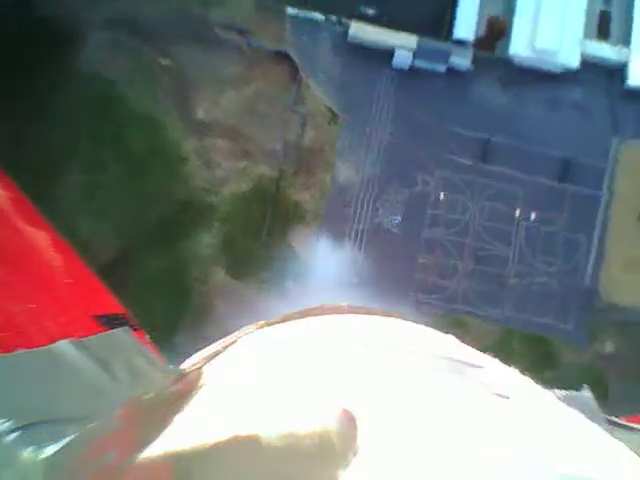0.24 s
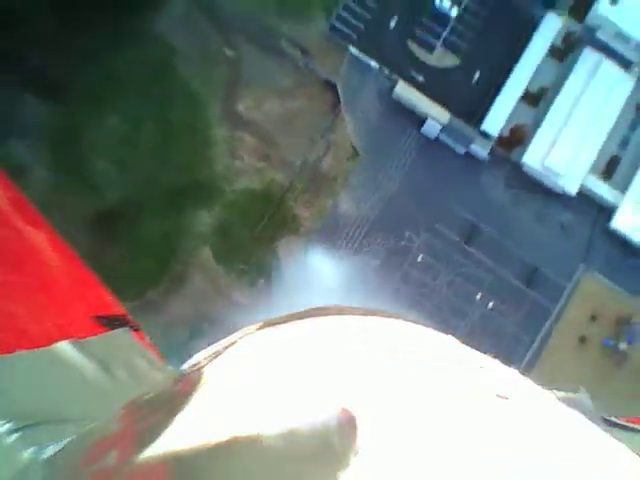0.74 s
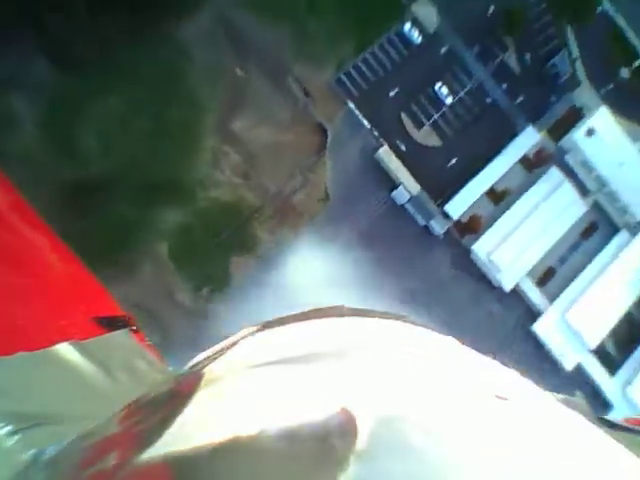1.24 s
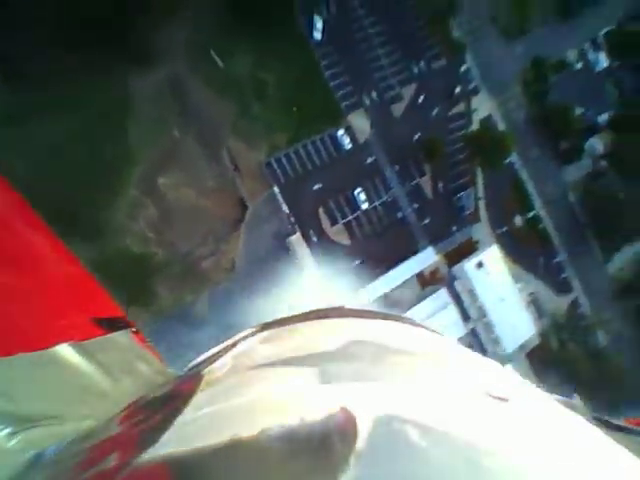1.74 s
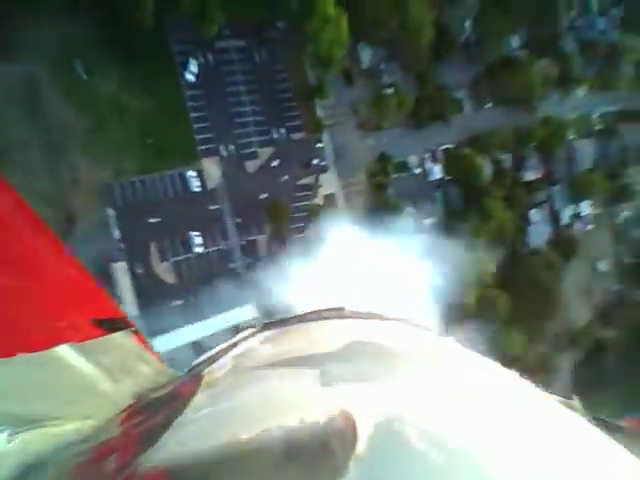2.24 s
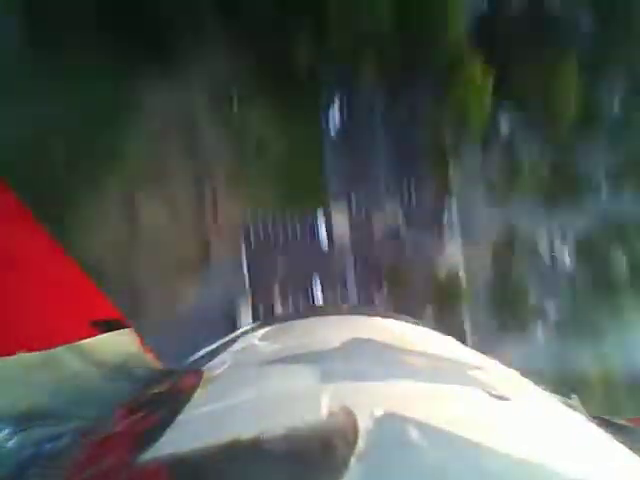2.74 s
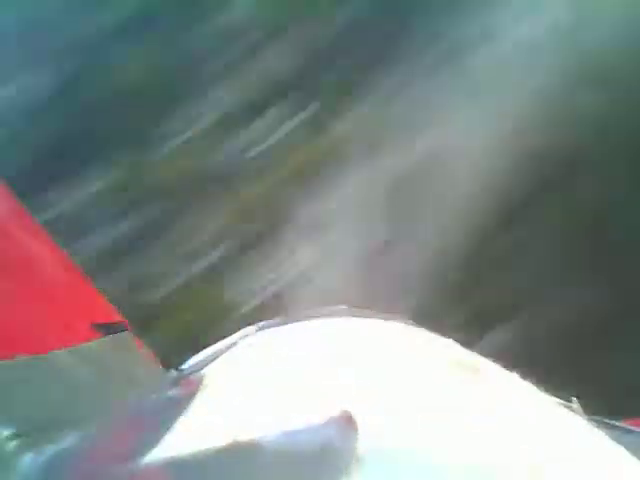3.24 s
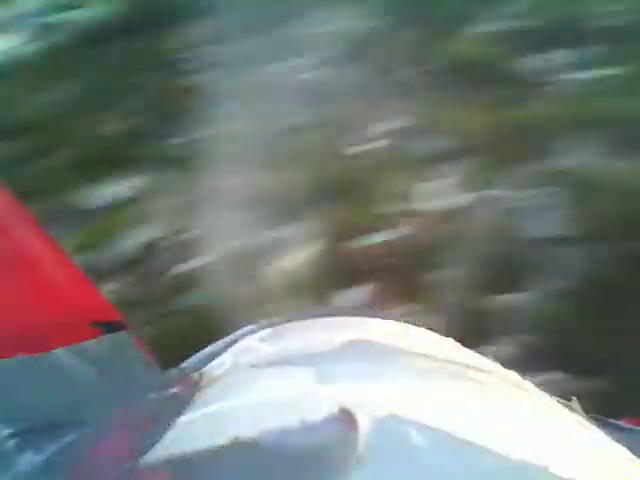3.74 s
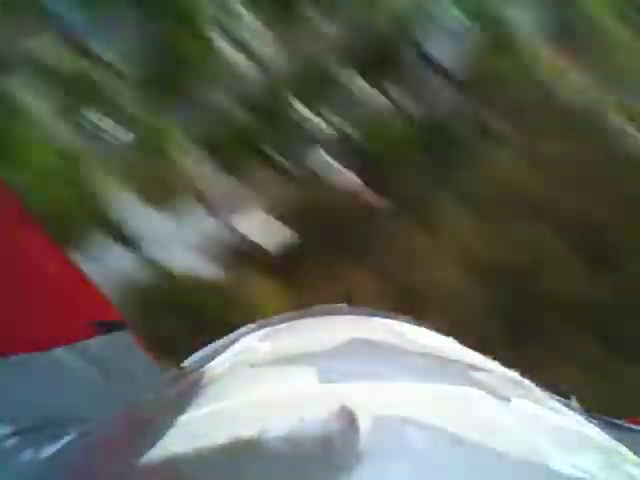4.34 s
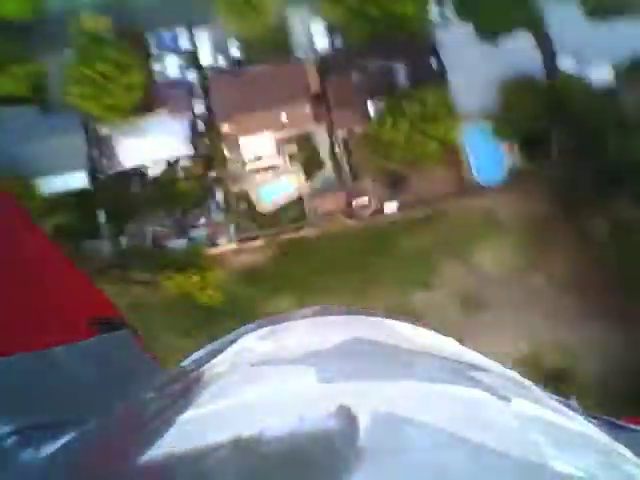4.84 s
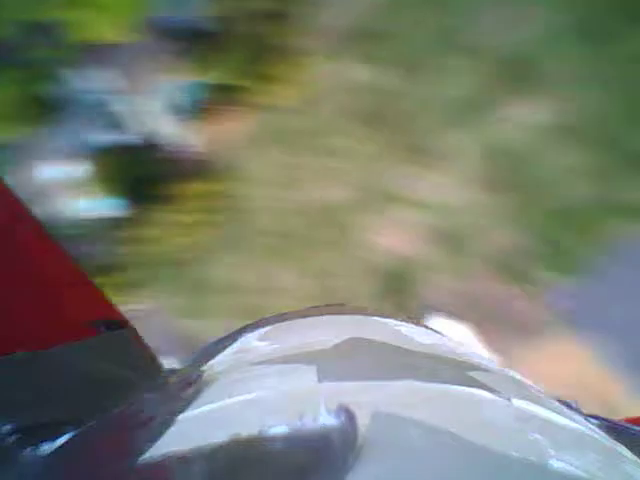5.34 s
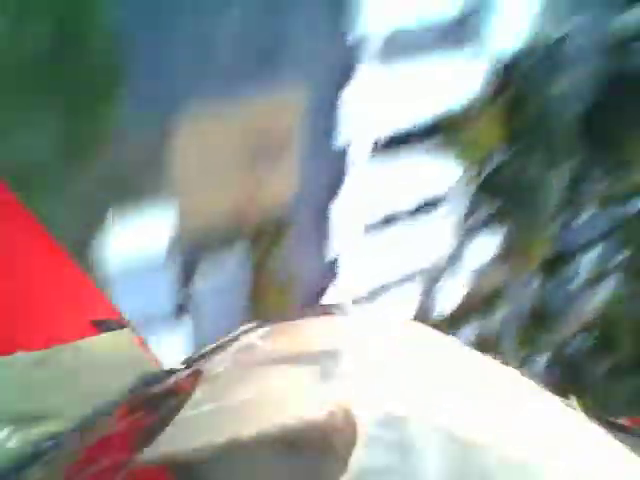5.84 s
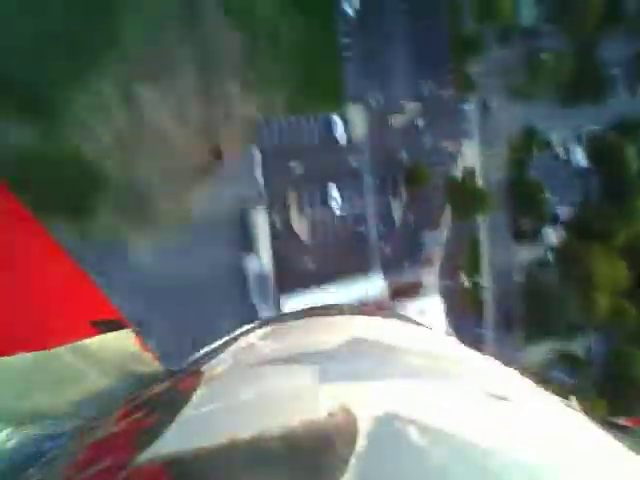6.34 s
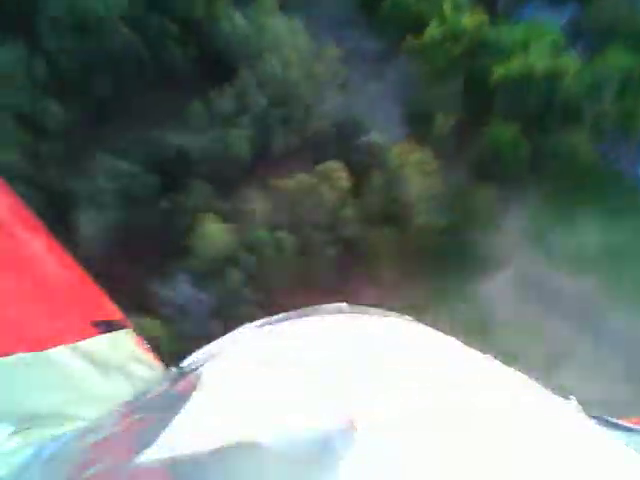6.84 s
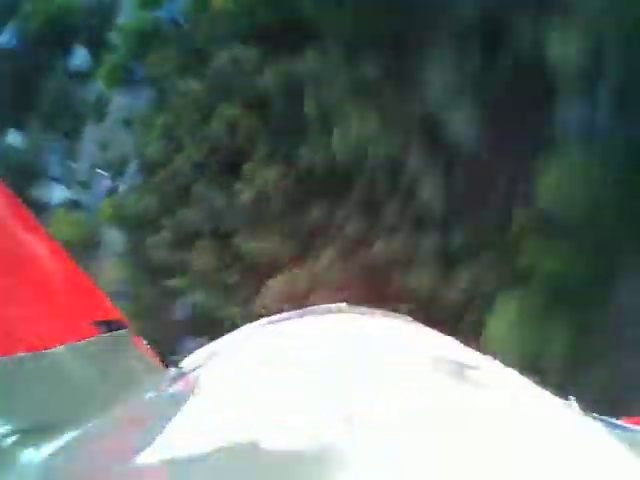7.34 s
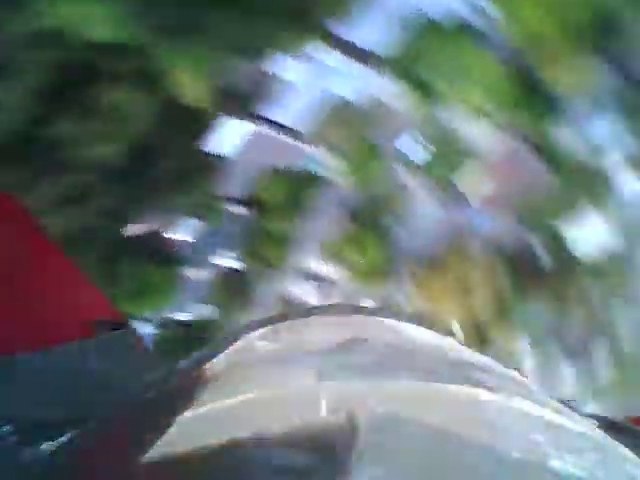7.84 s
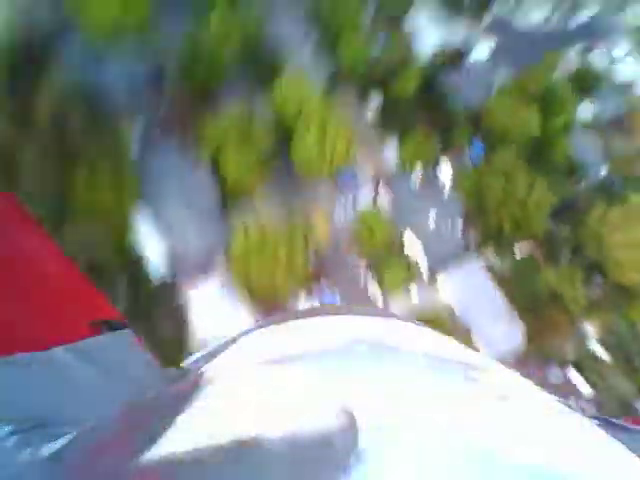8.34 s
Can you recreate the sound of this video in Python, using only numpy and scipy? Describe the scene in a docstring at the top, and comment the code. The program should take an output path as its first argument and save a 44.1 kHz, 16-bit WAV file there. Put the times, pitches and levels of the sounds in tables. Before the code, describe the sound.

Aboard a model rocket in open air, a rough motor roar with a faint sputtering hiss grows duller and weaker, then two quick blasts burst out. The tumbling tube follows: hollow knocks and bright clacks at irregular moments, gritty cord scraping, and gusts thumping the microphone. Close, dry, dull sound, crackling and distorting on hard blows.

```python
"""In open air, aboard a model rocket, a small camera is taped on and its microphone is in the airflow.
The motor is shaped noise that roars, turns duller and burns out; two noise surges are the ejection charge.
Then the tube tumbles: the nose cone knocks on it as ringing modes, the cord rubs as dense tiny slips,
and gusts of lumpy noise buffet the microphone. The little recorder overloads on the hard blows,
crackles with dropouts and keeps little treble."""
import sys
import numpy as np
from scipy import signal
from scipy.fft import rfft, irfft
from scipy.io import wavfile
from scipy.ndimage import uniform_filter1d, minimum_filter1d

SR = 44100
rng = np.random.default_rng(int(sys.argv[2]) if len(sys.argv) > 2 else 0)


def transcribe(u):
    """Save the signal u as a 16-bit wav file named by the first command-line argument.

    u: samples, shape (n,) or (channels, n), limited to [-1, 1]; the rate is SR.
    q: integer samples, one column per channel.
    """
    v = np.clip(np.atleast_2d(u).T, -1, 1)
    q = np.round(v * 32767).astype(np.int16)
    wavfile.write(sys.argv[1], SR, q)


N = 379260
TIME = np.arange(N) / SR

# Blows of the nose cone on the airframe. Each row: moment in seconds, level in dB, brightness in dB,
# contact (time to peak force) in seconds. Dull blows (brightness below 0) sound mostly the air column,
# bright ones the camera case; a long contact crunches.
KNOCKS = [(2.231, -10.5, 22.5, 0.00023), (2.2448, -10, 6.5, 0.00055), (2.3379, -2.5, -5.5, 0.0023),
          (2.4128, -6, 0, 0.0011), (2.631, -11, 27, 0.00018), (2.759, -16.5, -4, 0.0022),
          (3.1773, -4.5, 9, 0.00034), (3.233, -12.5, 18, 0.00021), (3.2539, 2, -4.5, 0.0011),
          (3.522, -7.5, 14, 0.00087), (3.533, -11, 20.5, 0.00049), (3.767, -16, -13, .001),
          (3.804, -6, -11.5, 0.0018), (3.824, -2, 23, .0005), (4.1846, -1, 14.5, .0004),
          (4.1887, -10.5, 14.5, 0.00037), (4.202, -8, 19, 0.00037), (4.4367, -6, -4.5, 0.0008),
          (4.4448, -5, 7.5, 0.00056), (4.8091, -1.5, 15, 0.00062), (4.996, -13, -6, 0.00088),
          (5.0066, 0, 1, 0.00068), (5.033, -10, -3.5, 0.0019), (5.392, -9, -9, 0.0025),
          (5.423, 0, -15.5, 0.0015), (5.4328, -3.5, 22, 0.00032), (5.476, -5, -7, 0.0007),
          (5.4953, -7.5, -3, 0.0013), (5.86, -7, 0, 0.00073), (5.87, 0, -4.5, 0.003),
          (6.038, -1, 5.5, 0.0005), (6.1865, -6, -3.5, .001), (6.194, -4.5, 1, .0007),
          (6.4873, -2, 1, 0.001), (6.64, -10.5, -3, 0.0016), (6.994, -11, -5, .002),
          (7.051, -13.5, 10.5, 0.00062), (7.057, -11.5, 15, 0.0004), (7.194, -19, 3.5, .0005),
          (7.914, 1.5, 13.5, 0.00047), (8.0781, 2.5, 1.5, 0.00045), (8.284, -12.5, -11, 0.0027),
          (8.382, -8, -6.5, 0.00071), (8.515, -2.5, -6.5, 0.002), (8.536, 0, -6.5, 0.0012),
          (8.5771, -2.5, -1, 0.0011)]


def undb(db):
    """Decibels to gain."""
    return 10 ** (np.asarray(db) / 20)


def unit(x):
    """Scale to rms 1."""
    return x / np.sqrt(np.mean(x ** 2))


def gains(rows):
    """One gain curve for each dB column after the seconds; silent outside the table."""
    s, *columns = np.transpose(rows)
    return [undb(np.interp(TIME, s, column, left=-120, right=-120)) for column in columns]


def colour(x, points):
    """Filter x by a curve of (Hz, dB) points that falls away beyond both ends, then scale to rms 1."""
    hz, db = np.transpose(points)
    f = np.maximum(np.fft.rfftfreq(N, 1 / SR), 1)
    skirts = np.minimum(f / hz[0], 1) * np.minimum(hz[-1] / f, 1) ** 2
    curve = undb(np.interp(np.log(f), np.log(hz), db))
    return unit(irfft(rfft(x) * curve * skirts, N))


def walk(rate):
    """Glide between random levels, one each 1 / rate seconds; spread about 1."""
    k = int(SR / rate)
    steps = np.repeat(rng.standard_normal(N // k + 1), k)
    return unit(uniform_filter1d(steps, k)[:N])


def grains(per_s, spread_db):
    """Random impulses of uneven size and either sign."""
    hit = rng.random(N) < per_s / SR
    sizes = undb(spread_db * np.clip(rng.standard_normal(N), -2, 2))
    return hit * rng.choice([-1, 1], N) * sizes


def arch(start, length, skew=1):
    """A rounded rise and fall of height 1; skew under 1 brings the top forward."""
    inside = slice(*np.searchsorted(TIME, [start, start + length]))
    along = (TIME[inside] - start) / length
    shape = np.zeros(N)
    shape[inside] = np.abs(np.sin(np.pi * along ** skew)) ** .8
    return shape


def coast(kicks, fall_s):
    """Each kick dies away exponentially, by 1/e in fall_s."""
    return signal.lfilter([1], [1, -np.exp(-1 / (fall_s * SR))], kicks + 1e-12)


def lee(lull_s=0.19):
    """How far the tube shelters the microphone, 0-1, in lulls of lull_s seconds."""
    # Moments in the lee of the tube. Each row: middle in seconds, shelter from 0 to 1.
    lulls = [(2.31, 0.5), (3.31, 0.4), (3.579, 0.13), (4.241, 1), (4.55, 0.6), (4.93, 0.36), (5.13, 0.6),
             (5.68, 0.32), (6.1, 0), (6.85, 0.67), (7.14, 0.66)]
    return sum(shelter * arch(s - lull_s / 2, lull_s) ** 2 for s, shelter in lulls)


def shares(brightness_db):
    """Split a blow between air column, tube wall and camera case, each one brightness step above the last."""
    split = undb(brightness_db * np.arange(3))
    return split / np.linalg.norm(split)


def motor():
    """Turbulent roar that shifts to the bass with speed, and a sputtering hiss of the jet."""
    # Motor burn. Each row: time in seconds, roar in dB, hiss of the jet in dB, both before sputter.
    burn = [(0, -12.5, -30), (.3, -13.5, -26.5), (1.1, -15, -33), (1.4, -16, -41.5), (1.65, -18, -47.5),
            (1.9, -24, -47), (2.08, -25.5, -45), (2.18, -26.5, -36)]
    # The roar sinks as the rocket outruns its own jet noise. Each row: time in seconds, late colour 0-1.
    climb = [(0, 0.02), (.5, 0.13), (1.0, 0.5), (1.45, 1), (2.2, 0.98)]
    # Spectra of the roar at lift-off, the roar in fast flight, and the jet.
    # Each row: frequency in Hz, relative level in dB.
    roar_early = [(25, -26.5), (70, -15.5), (150, -10.5), (280, -2.5), (480, -2), (750, -3), (1300, -7.5),
                  (1800, -13), (2600, -24)]
    roar_late = [(25, -13.5), (70, -8), (130, -2.5), (260, 2), (380, -1.5), (550, -3), (800, -6.5),
                 (1300, -7), (1800, -18.5), (2600, -30.5)]
    jet_colour = [(900, -17.5), (1700, -16.5), (2300, 1.5), (3000, -4), (3600, -10.5), (4200, -5.5)]
    roar, hiss = gains(burn)
    late = np.clip(np.interp(TIME, *np.transpose(climb)), 0, 1)
    eddies = rng.standard_normal(N)
    body = (1 - late) * colour(eddies, roar_early) + late * colour(eddies, roar_late)
    sputter = walk(70)
    jet = colour(rng.standard_normal(N), jet_colour) * undb(2.8 * sputter)
    return roar * np.clip(body, -3, 3) * undb(1.18 + .5 * sputter) + hiss * jet


def cord_speed(lull_db=-9, wander_db=4, jerk_spread_db=3):
    """The cord never lies quite still: it jerks, speeds up into bright blows, coasts on and strokes between."""
    # Strokes between the blows. Each row: start in seconds, length in seconds, speed in dB.
    stroke_rows = [(2.199, 0.11, -36.5), (2.293, 0.11, -41), (2.416, 0.082, -37), (2.518, 0.16, -33),
                   (3.043, 0.15, -30.5), (3.351, 0.04, -34), (3.423, 0.12, -37), (3.66, 0.082, -44),
                   (3.896, 0.024, -35), (4.032, 0.087, -37), (4.47, 0.12, -44), (4.604, 0.13, -36),
                   (5.042, 0.061, -36.5), (5.252, 0.061, -37.5), (5.583, 0.13, -46), (5.703, 0.11, -39),
                   (6.322, 0.042, -34), (6.752, 0.076, -42), (6.873, 0.05, -32.5), (7.29, 0.017, -31),
                   (7.318, 0.014, -35), (7.405, 0.23, -44.5), (7.573, 0.11, -34.5), (7.724, 0.048, -33),
                   (7.94, 0.039, -57), (8.131, 0.058, -47), (8.214, 0.058, -36)]
    floor_db = -57
    jerks_per_s, jerk_db, jerk_s = 22, -40, 0.0041  # small random tugs; time to fall by 1/e
    tighten_db, tighten_s = -43.5, 0.12  # the cord draws tight before a bright blow on the camera case
    slide_on_db, slide_on_s = -35, 0.021  # after a blow: relative to its level; time to fall by 1/e
    tugs = undb(jerk_db) * coast(np.abs(grains(jerks_per_s, jerk_spread_db)), jerk_s)
    creep = undb(floor_db + wander_db * walk(28))
    idle = (creep + tugs) * undb(lull_db * lee())
    kicks, tighten = np.zeros((2, N))
    for s, db, brightness_db, _ in KNOCKS:
        kicks[int(s * SR)] = undb(db + slide_on_db)
        if brightness_db > 0:
            pull = shares(brightness_db)[-1] ** 4 * arch(s - tighten_s, tighten_s, skew=2.6)
            tighten = np.maximum(tighten, pull)
    strokes = sum(undb(db) * arch(start, length) for start, length, db in stroke_rows)
    return idle + np.maximum(strokes, undb(tighten_db) * tighten) + coast(kicks, slide_on_s)


def cord():
    """The cord slides on the tube in jerky strokes: dense tiny slips through the tube's resonances."""
    # Resonances under the sliding cord. Each row: frequency in Hz, relative level in dB.
    slide_colour = [(120, -10), (175, 8), (330, -18), (500, 3.5), (700, -25), (1000, -11.5), (1250, -2),
                    (1550, -5), (1850, 1.5), (2400, -8.5), (2750, -9), (3150, -2), (3600, -14.5),
                    (4200, -7.5)]
    grip = undb(2.2 * walk(70) + 2 * walk(300))
    slips = grains(per_s=5000, spread_db=4) * grip
    return cord_speed() * undb(3.0) * colour(slips, slide_colour)


def airflow():
    """Strength of buffeting and rush: a steady flow that sinks in the lee, with gusts on top."""
    # Gusts as the microphone swings into the airflow.
    # Each row: start in seconds, length in seconds, buffeting in dB, rush in dB (ahead of wind's own gains).
    gust_rows = [(2.866, 0.24, -25.5, -38.5), (2.995, 0.032, -17, -32), (3.081, .11, -26, -35),
                 (3.331, .12, -28.5, -42.5), (3.62, 0.18, -25, -45), (3.744, 0.91, -36, -59),
                 (5.19, 0.22, -29, -40), (5.926, 0.17, -28, -40), (6.218, 0.3, -28.5, -37),
                 (6.54, 0.2, -25, -41.5), (6.993, 0.094, -25.5, -43), (7.455, 0.21, -20.5, -28.5),
                 (7.572, 0.32, -32.5, -40), (8.278, .23, -21, -45), (8.508, 0.092, -27, -35)]
    buffet_db, rush_db, from_s = -34.5, -43.5, 2.17  # steady flow while the rocket tumbles
    lull_buffet_db, lull_rush_db = -9, -12.5  # change in full shelter
    falling, shelter = TIME > from_s, lee()
    buffet = falling * undb(buffet_db + lull_buffet_db * shelter)
    rush = falling * undb(rush_db + lull_rush_db * shelter)
    for start, length, gust_buffet_db, gust_rush_db in gust_rows:
        gust = arch(start, length, skew=0.72)  # rises faster than it dies
        buffet = np.hypot(buffet, undb(gust_buffet_db) * gust)
        rush = np.hypot(rush, undb(gust_rush_db) * gust)
    return buffet, rush


def wind(lump_db=1.5):
    """Eddies thump on the microphone port, deepest in the slow air near the top; a finer rush flutters too."""
    # Large slow eddies near the top of the flight. Each row: time in seconds, level in dB.
    rumble_levels = [(2.8, -43), (4.1, -35), (4.6, -50)]
    # Spectra of the thumps and of the rush. Each row: frequency in Hz, relative level in dB.
    buffet_colour = [(20, -13.5), (50, -4.5), (110, 1), (190, 1.5), (300, -5.5), (450, -10.5), (800, -33.5),
                     (1600, -54.5)]
    rush_colour = [(150, -3.5), (350, 3), (520, 2.5), (700, -1.5), (1250, -5), (1700, -17), (3000, -38.5),
                   (4200, -49)]
    buffet, rush = airflow()
    deep, = gains(rumble_levels)
    gust = walk(60)
    thumps = colour(grains(per_s=1200, spread_db=3), buffet_colour) * undb(1.8 * gust)
    air = colour(rng.standard_normal(N), rush_colour) * undb(2.1 * gust + 2 * walk(220))
    rumble = colour(rng.standard_normal(N), [(30, 0), (80, 0)])
    lumps = undb(lump_db * walk(24))  # unevenness within the gusts
    return buffet * thumps * lumps + undb(5.5) * rush * air + deep * rumble


def ejection(hum_hz=170, hum_db=-25, hum_t60=0.64, skew=1.02):
    """The charge blasts hot gas through the tube in two quick surges and leaves its air column humming."""
    # Surges of the charge. Each row: start in seconds, length in seconds, level in dB.
    surges = [(2.179, 0.031, -6), (2.2084, 0.017, -11)]
    # Spectrum of the blast. Each row: frequency in Hz, relative level in dB.
    charge_colour = [(40, -11), (170, -2), (400, 2.5), (900, 4.5), (1400, -1), (2000, -4.5), (3200, -6.5),
                     (4200, -8)]
    blast = sum(undb(db) * arch(start, length, skew) for start, length, db in surges)
    t = np.maximum(TIME - 2.2, 0)
    hum = undb(hum_db - 60 * t / hum_t60) * np.sin(2 * np.pi * hum_hz * t)
    return blast * colour(rng.standard_normal(N), charge_colour) + hum


def ring(modes, force, t, detune):
    """Damped modes driven by a contact force; the first 18 ms carry the energy of a 2 ms tone of peak 1."""
    hz, db, t60 = np.transpose(modes)[:, :, None]
    chance = rng.standard_normal((2, len(modes), 1))  # every blow lands on another spot
    sign = (-1) ** np.arange(len(modes))[:, None]
    decay = undb(db + 2.48 * chance[0] - 60 * t / t60)
    tones = sign * decay * np.sin(2 * np.pi * hz * (1 + detune * chance[1]) * t)
    y = signal.fftconvolve(tones.sum(0), force)[:len(t)]
    return y / np.sqrt(np.sum(y[t < .018] ** 2) / SR / .001)


def knocks(chatter_db=-26, bounce_db=-17, bounce_s=0.0093, detune=0.059):
    """Each blow is a graze and a brief gritty contact, then weak bounces and chatter as the parts slide apart."""
    # What the blows ring: air column, tube wall, camera case.
    # Each row: frequency in Hz, relative level in dB, decay by 60 dB in seconds (pitch and level vary by blow).
    column = [(173.6, -18, 0.17), (300, -11.5, 0.04), (385, -3, 0.017), (485, -0.5, 0.061),
              (653, -8.5, 0.02), (770, -3, 0.013)]
    wall = [(1050, -1.7, 0.014), (1226, 1.4, 0.011), (1498, -0.78, 0.0083), (1752, 0.37, 0.015),
            (2020, -2.2, 0.0028)]
    case = [(2490, -2.5, 0.0066), (2787, 1.5, 0.0044), (3092, -0.5, 0.0077), (3490, -2, 0.0032),
            (4010, -5.5, 0.0023)]
    # Unpitched crack of the contact. Each row: frequency in Hz, relative level in dB.
    crack_colour = [(200, 0), (600, -3), (1500, -1), (4200, -1)]
    part_gains = undb([-0.8, 2.3, 0.97])  # how readily column, wall and case ring
    graze_db, graze_s = -27.5, 0.0034  # the parts graze just before they meet
    crack_db = -14  # relative to the spread of all the ringing
    t = np.arange(SR // 7) / SR
    lead_s = .006  # room for the graze
    since = t - lead_s
    graze = undb(graze_db) * np.exp(-np.abs(since) / graze_s)
    chatter = undb(chatter_db) * np.exp(-np.abs(since) / bounce_s)
    rung, crack = np.zeros((2, N + len(t)))
    for s, level_db, brightness_db, contact_s in KNOCKS:
        push = np.where(since < 0, graze, chatter)
        delays = np.cumsum(bounce_s * rng.uniform(0.46, 2, size=2))
        for delay, db in zip([0, *delays], [0, bounce_db, 1.9 * bounce_db]):
            age = np.maximum(since - delay, 0) / contact_s
            push = push + undb(db) * age * np.exp(1 - age)
        force = rng.standard_normal(len(t)) * push
        sizes = undb(level_db) * shares(brightness_db) * part_gains
        span = int((s - lead_s) * SR) + np.arange(len(t))
        for size, modes in zip(sizes, [column, wall, case]):
            rung[span] += size * ring(modes, force, t, detune)
        crack[span] += sizes[1] * unit(force)
    return rung[:N] + undb(crack_db) * np.std(rung) * colour(crack[:N], crack_colour)


def scene():
    """Everything sounds within a hand's length of the microphone, in open air: a dry sum without echoes."""
    return (motor() + cord() + wind() + ejection() + knocks())[None]


def record(dry, dropouts_per_s=100, loud_db=-20, top_hz=4850, clip_level=.72):
    """Tiny dropouts crackle along with loud sound; a steep filter cuts the top; hard blows clip and spit treble."""
    load = np.clip(uniform_filter1d(dry[0] ** 2, size=1300) / undb(loud_db) ** 2, 0, 1)
    kept = 1. * (rng.random(N) > load * dropouts_per_s / SR)
    gaps = minimum_filter1d(kept, size=5)  # each dropout lasts five samples
    rounded = .82 * np.tanh(dry * gaps / .82)
    narrow = signal.sosfilt(signal.cheby2(12, 70, top_hz, fs=SR, output="sos"), rounded)
    flattened = np.clip(narrow, -clip_level, clip_level)
    return signal.sosfilt(signal.ellip(8, .2, 70, 16000, fs=SR, output="sos"), flattened)


dry = scene()
out = record(dry)
transcribe(out)
```